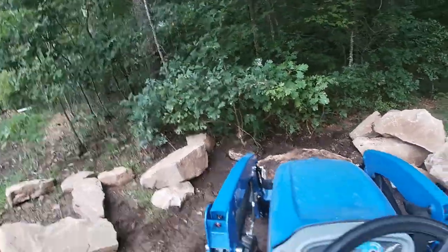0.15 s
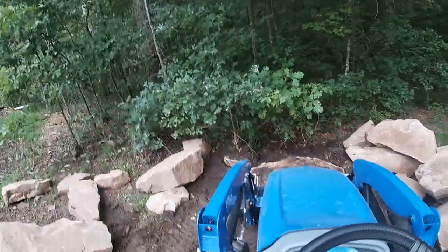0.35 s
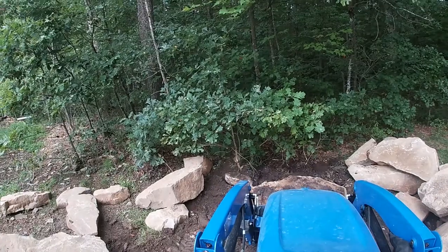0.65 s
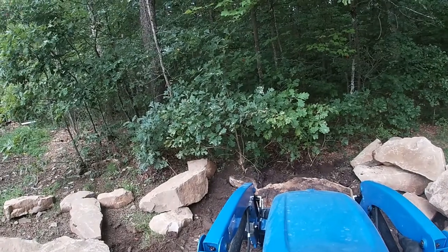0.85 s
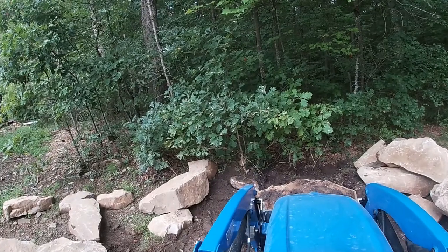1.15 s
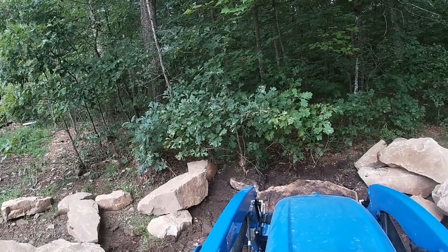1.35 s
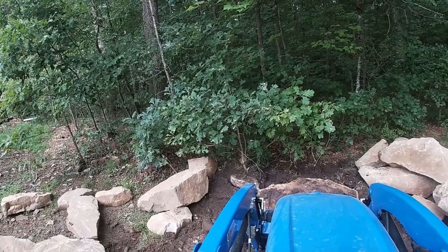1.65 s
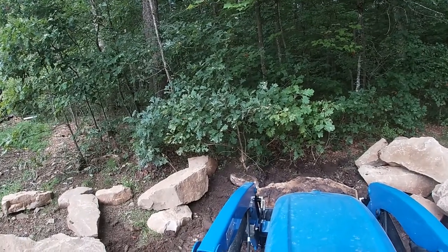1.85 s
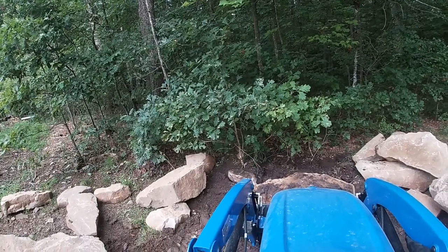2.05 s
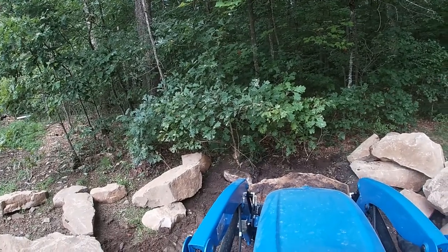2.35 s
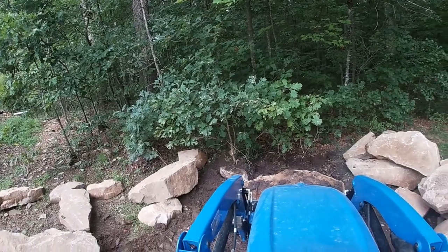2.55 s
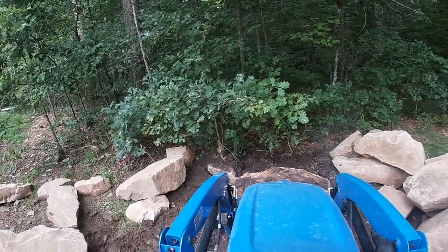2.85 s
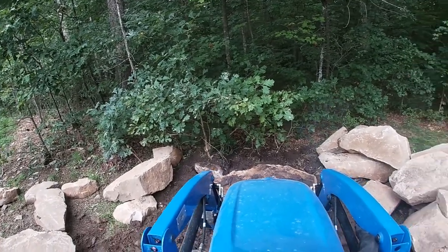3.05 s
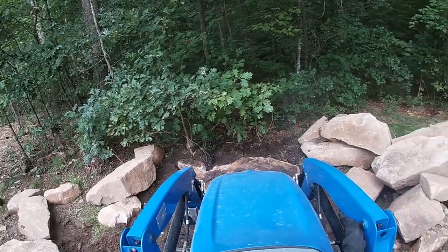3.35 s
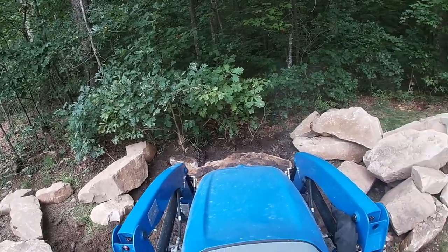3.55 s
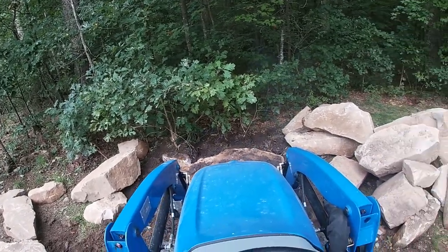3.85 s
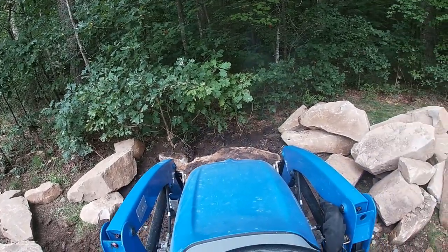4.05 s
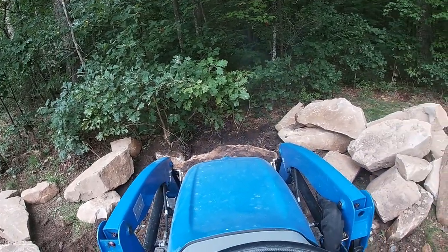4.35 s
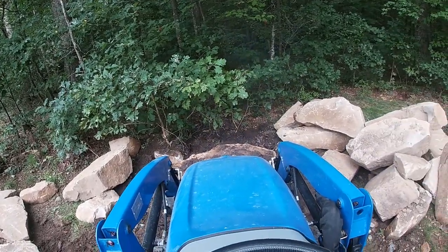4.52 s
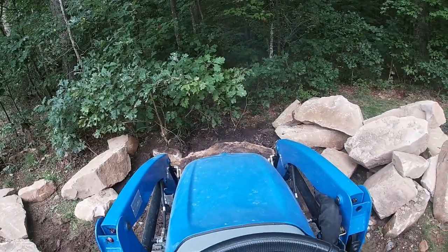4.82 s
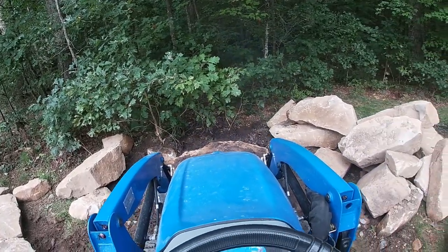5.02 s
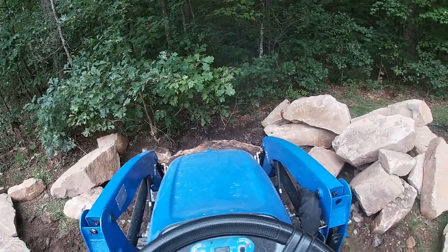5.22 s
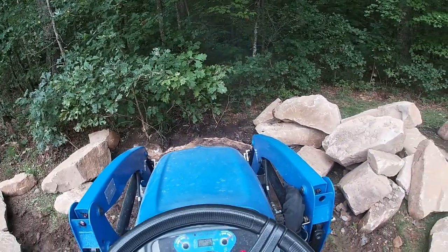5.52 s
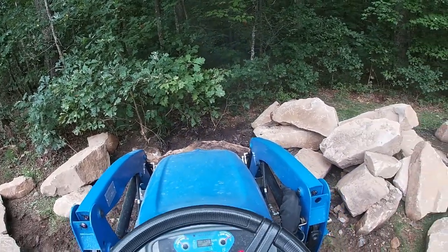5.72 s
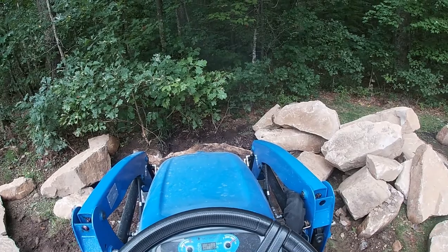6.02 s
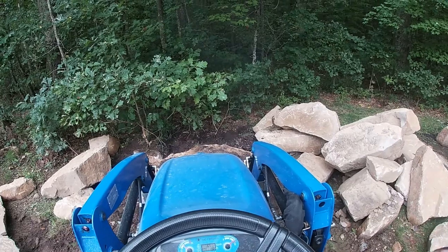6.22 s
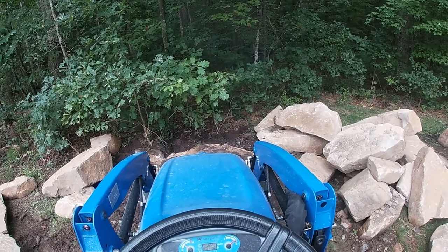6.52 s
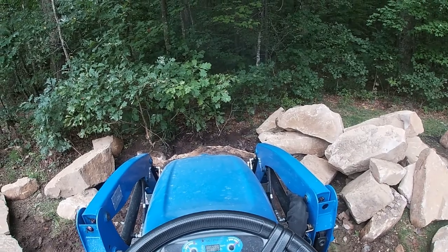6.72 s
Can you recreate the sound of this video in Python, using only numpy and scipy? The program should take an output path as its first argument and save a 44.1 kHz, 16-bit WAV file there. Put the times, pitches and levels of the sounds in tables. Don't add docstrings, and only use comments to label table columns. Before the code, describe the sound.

A small three-cylinder diesel starts, heard very close and dry in the open air. Soft rubbing, a faint seat squeak and a brief priming hum come first, then metallic clacks and a short gritty starter grind. The engine coughs, runs up quickly with booming bonnet and rattling sheet metal, and smooths into a low chugging idle. Later the throttle lifts it to a quicker drone with faint belt and pump whistling.

```python
import sys
import numpy as np
from scipy import signal
from scipy.fft import rfft, irfft, next_fast_len
from scipy.io import wavfile
from scipy.ndimage import uniform_filter1d

SR = 44100
rng = np.random.default_rng(int(sys.argv[2]) if len(sys.argv) > 2 else 0)


def store_wav(level_fs):
    pcm = np.round(np.clip(np.atleast_2d(level_fs), -1, 1) * 32767)
    wavfile.write(sys.argv[1], SR, pcm.T.astype(np.int16))


def undo_db(level):
    steps = np.asarray(level, float) / 20
    return 10 ** steps


N = 303408
TIME = np.arange(N) / SR
IDLE_PER_S = 34.4

# t/s, firing rate/Hz
SPEED = [(1.643, 5.5), (1.72, 7.3), (1.82, 12.7), (1.89, 15.9), (2.01, 21.6), (2.17, 27.5), (2.26, 30.5),
         (2.34, 32.3), (2.45, 34.5), (2.68, 34.6), (2.89, 34.25), (4.3, 34.45), (4.45, 36.9), (4.57, 40.2),
         (4.7, 42.6), (4.81, 42.6), (5.03, 41.8), (6.88, 42.0)]


def rms_one(x):
    return x / np.sqrt(np.mean(x ** 2) + 1e-20)


def low_pass(x, hz):
    return signal.sosfilt(signal.butter(4, hz, fs=SR, output="sos"), x)


def ramp(s, rise_s):
    return np.clip((TIME - s) / rise_s, 0, 1)


def swells(rows):
    total = 0
    for s, rise, fall, level_db in rows:
        side = np.where(TIME < s, rise, fall)
        total = total + undo_db(level_db - 12 * ((TIME - s) / side) ** 2)
    return total


def noise(spectrum, source=None):
    hz, level_db = np.transpose(spectrum)
    size = next_fast_len(N)
    log_hz = np.log(np.maximum(np.arange(size // 2 + 1) * SR / size, 1))
    source = rng.standard_normal(size) if source is None else source
    gain = undo_db(np.interp(log_hz, np.log(hz), level_db, -90, -90))
    return rms_one(irfft(rfft(source, size) * gain, size)[:N])


def drift(rate):
    r = np.exp(-80 * np.pi * rate / SR)
    slow = signal.lfilter([1], [1, -2 * r, r * r], rng.standard_normal(N // 40 + 2002))[2000:]
    return np.interp(np.arange(N) / 40, np.arange(len(slow)), rms_one(slow))


def ring(clicks, hz, level_db, t60):
    r = undo_db(-60 / (max(t60, .005) * SR))
    w = 2 * np.pi * hz / SR
    return undo_db(level_db) * signal.lfilter([0, np.sin(w)], [1, -2 * r * np.cos(w), r * r], clicks + 1e-18)


def resonate(x, peaks):
    out = 0
    for hz, width, level_db in peaks:
        r = np.exp(-np.pi * width / SR)
        poles = [1, -2 * r * np.cos(2 * np.pi * hz / SR), r * r]
        out = out + undo_db(level_db) * signal.lfilter([1 - r, 0, r - 1], poles, x)
    return out


def dying(clicks, t60, rise_s):
    r, a = undo_db(-60 / (t60 * SR)), np.exp(-1 / (rise_s * SR))
    return signal.lfilter([1 - a], [1, -a], signal.lfilter([1], [1, -r], clicks))


def click_at(s, level_db):
    out = np.zeros(N)
    out[round(s * SR)] = undo_db(level_db)
    return out


def knocks(blows):
    tap = [(300, -6), (1000, 1), (2200, 1), (4500, -6), (7000, -32)]
    tick = noise(tap)
    out = 0
    for s, level_db, hz, t60, tick_db in blows:
        hit = click_at(s, level_db)
        body = signal.lfilter([1, -1], [1, -.985], ring(hit, hz, 0, t60))
        out = out + body + undo_db(tick_db) * dying(hit, t60=.031, rise_s=.00099) * tick
    return out


def wavering(tones):
    strands = []
    for split_hz, strand_db in ((0, -.5), (34, -8), (-42, -9)):
        strands.append((split_hz + 6 * drift(35), undo_db(strand_db + 2.6 * drift(50))))
    out = np.zeros(N)
    for hz, level in tones:
        on = np.flatnonzero(level > 1e-6)
        shift = rng.integers(N)
        for waver_hz, flutter in strands:
            phase = 2 * np.pi * np.cumsum(hz[on] + waver_hz[on - shift]) / SR
            out[on] += level[on] * flutter[on - shift] * np.sin(phase)
    return out


def speed_curve():
    s, per_s = np.transpose(SPEED)
    return uniform_filter1d(np.interp(TIME, s, per_s), size=200)


def firing_rate():
    return speed_curve() * (TIME > SPEED[0][0])


def crank_turns():
    return np.cumsum(firing_rate()) / SR - 1e-6


def effort(power):
    full_gain_per_s2, governor_s = 37.8, .28
    gain = uniform_filter1d(np.gradient(speed_curve()) * SR, size=round(governor_s * SR))
    return np.clip(gain / full_gain_per_s2, 0, 1) ** power


def load(rate, idle_db, slope_db, full_db):
    return idle_db + slope_db * (rate - IDLE_PER_S) + full_db * effort(2.2)


def per_firing(turns, lead, cylinder_db, spread_db, delay_s=0):
    count = np.floor(turns - lead).astype(int)
    at = np.flatnonzero(np.diff(count)) + 1
    size_db = np.array(cylinder_db)[count[at] % 3] + spread_db * rng.standard_normal(400)[:len(at)]
    out = np.zeros(2 * N)
    out[at + round(delay_s * SR)] = undo_db(size_db)
    return out[:N]


def seat():
    rub_spectrum = [(71, -45), (120, -5.5), (156, 4), (333, -4.5), (397, -8), (653, -13), (773, -17),
                    (900, -14), (1170, -48), (1980, -120)]
    rustle_spectrum = [(290, -41), (500, -5.5), (911, -15), (1370, -10.5), (1610, -14), (1880, -8.5),
                       (2570, -13.5), (3110, -14.5), (4810, -17), (8290, -23.5), (13000, -60)]
    # t/s, rise/s, fall/s, rub level/dB, rustle level/dB
    moves = [(.022, 0.023, 0.053, -33.5, -39), (.16, 0.16, 0.069, -47, -58.5),
             (.265, 0.028, 0.06, -53, -53.5), (.575, 0.13, 0.098, -65, -58),
             (.655, 0.051, 0.091, -42.5, -55.5), (.934, 0.083, 0.061, -59, -63),
             (1.05, 0.036, 0.13, -57, -84), (1.254, 0.041, 0.025, -58, -52)]
    buzz = ramp(1.684, .065)
    rub = undo_db(-70) + swells([(s, rise, fall, rub_db) for s, rise, fall, rub_db, _ in moves])
    rub = rub + undo_db(-41.5) * buzz
    rustle = undo_db(-65.5) + swells([(s, rise, fall, cloth_db) for s, rise, fall, _, cloth_db in moves])
    rustle = rustle + undo_db(-43) * buzz
    rubbing = rub * undo_db(2.7 * drift(25)) * noise(rub_spectrum)
    return rubbing + rustle * undo_db(-2 + 1.6 * drift(72)) * noise(rustle_spectrum)


def bumps():
    # t/s, peak level/dB, f/Hz, t60/s, tick level/dB
    blows = [(.019, -18, 230, 0.039, -34), (0.149, -41.5, 305, 0.16, -8), (0.258, -43, 1290, 0.047, -14),
             (0.33, -52, 610, 0.07, 2), (0.024, -36, 2700, 0.06, -20), (0.056, -29, 4900, 0.011, -16),
             (.057, -36, 3500, 0.0093, -20), (.63, -44, 4400, .01, -6), (0.012, -43, 8200, .06, -20),
             (.055, -42.5, 8000, .03, -20), (1.204, -44, 1360, 0.054, -3), (1.203, -42, 420, 0.046, -20),
             (1.249, -33.5, 360, 0.059, -30), (1.5, -23, 175, 0.06, -20), (1.845, -30, 1100, 0.051, -17),
             (1.888, -24, 1000, 0.062, -16), (0.643, -20.5, 490, 0.012, -18.5), (0.7, -38, 250, 0.13, -20),
             (0.687, -37, 920, 0.056, -6), (0.71, -41, 475, 0.15, -11), (1.074, -47, 202, 0.048, -8),
             (1.076, -49, 1500, .02, -20), (1.249, -27, 5000, 0.034, -20), (1.287, -28, 1950, .035, -20),
             (1.228, -53, 4500, .02, -20), (1.1, -50, 2550, .03, -20)]
    return knocks(blows)


def wood_and_air():
    wood = [(59, -37.5), (100, -15), (161, 2.5), (312, -22), (376, -24), (512, -16), (993, -17.5),
            (1330, -19.5), (8010, -21), (14000, -52)]
    # t/s, rise/s, fall/s, level/dB
    gusts = [(.044, 0.028, 0.19, -43), (.694, 0.064, .13, -62), (1.02, .12, .35, -73),
             (1.41, 0.03, 0.13, -46), (1.645, .04, 0.015, -46)]
    wind = noise([(15, -13), (32, -4.5), (60, -16), (110, -14.5)])
    return undo_db(-58) * noise(wood) + (swells(gusts) + undo_db(-71.5)) * wind


def seat_spring():
    # t/s, rise/s, fall/s, level/dB
    squeaks = [(.15, .09, .05, -67), (.25, .07, 0.075, -71.5), (.36, .03, .02, -74), (.44, 0.0091, .1, -72)]
    spring = low_pass(resonate(rng.standard_normal(N), [(1265, 110, 0)]), hz=1800)
    return undo_db(11.5) * swells(squeaks) * rms_one(spring)


def creak_and_pump():
    # t/s, half length/s, f/Hz, level/dB
    creak = [(.587, .025, 346, -46), (.588, .025, 640, -52)]
    # t/s, half length/s, f/Hz, level/dB
    hum = [(.98, .12, 2240, -69), (1.0, .1, 2110, -70), (.97, .07, 708, -62)]
    tones = []
    for s, half, hz, level_db in [*creak, *hum]:
        tones.append((hz + 0 * TIME, swells([(s, half, half, level_db)])))
    return wavering(tones)


def clacks():
    # t/s, peak level/dB, t60/s
    blows = [
        (1.203, -40, 0.059),
        (1.229, -52, 0.046),
        (1.248, -12.5, 0.083),
        (1.286, -12.5, 0.21),
        (1.368, -6.5, 6.0),
    ]
    modes = [(485, 2.5, 0.023), (2589, -23, 0.054), (4230, -19, 0.025), (5170, -21, 0.056),
             (7300, -25, 0.076), (8340, -23, 0.1), (8300, -22, 0.18), (9000, 11, 0.036)]
    crack_spectrum = [(120, -41), (200, -17), (400, -7.5), (1280, -8.5), (1560, -5.5), (2130, -7),
                      (5010, -4.5), (6350, -12.5), (7480, -7), (11000, -31), (13900, -39), (15500, -53)]
    crack = noise(crack_spectrum)
    out = 0
    for s, level_db, t60 in blows:
        burst = dying(click_at(s, level_db - 15.5), min(t60, .12), rise_s=.00076) * crack
        out = out + burst
        for hz, mode_db, mode_t60 in modes:
            out = out + ring(burst, hz, mode_db - 41.5 + 3 * rng.standard_normal(), mode_t60)
    return out


def starter():
    gears = [(180, -33), (300, -29), (498, -1.5), (587, -17), (703, -4), (898, -8.5), (1420, -4),
             (1540, -8), (2070, -9), (4850, -11.5), (6400, -18), (7670, -14.5), (15000, -58)]
    gear_case = [(920, 78, -12.5), (1580, 2.8, 3.5), (2840, 44, -13), (3150, 23, -8), (3690, 21, -12),
                 (4350, 35, -15), (4910, 30, -10.5), (7270, 300, -48)]
    # t/s, rise/s, fall/s, level/dB
    grinds = [(1.385, 0.02, 0.071, -27), (1.48, 0.052, 0.069, -29.5), (1.66, 0.1, 0.1, -26),
              (1.78, .04, 0.033, -59.5), (1.895, 0.12, 0.008, -32)]
    # t/s, rise/s, fall/s, level/dB
    groans = [(1.42, 0.05, 0.17, -36.5), (1.34, .03, .03, -61), (1.755, 0.1, 0.025, -45.5),
              (1.895, 0.032, 0.0088, -21.5)]
    # t/s, rise/s, fall/s, level/dB
    rings = [(1.372, 0.005, 0.04, -31), (1.53, 0.055, 0.023, -41), (1.61, .06, .05, -43.5),
             (1.68, 0.041, 0.14, -38), (1.765, 0.036, 0.053, -36), (1.86, 0.031, 0.038, -34.5),
             (1.95, 0.0049, 0.015, -33), (2.21, .01, 0.015, -31.5)]
    flywheel_hz = 1548
    teeth = noise(gears) * undo_db(2.2 * drift(220) + .5 * drift(35))
    grind = rms_one(teeth + undo_db(15.5) * resonate(teeth, gear_case))
    bell_phase = 2 * np.pi * np.cumsum(flywheel_hz + 5 * drift(25)) / SR
    bell = np.sqrt(2) * undo_db(2.2 * drift(50)) * np.sin(bell_phase)
    hum_modes = [(187, 160, -2), (239, 17, 2)]
    groan = rms_one(low_pass(resonate(rng.standard_normal(N), hum_modes), hz=320))
    strike = ring(click_at(1.37, -24), flywheel_hz, 0, t60=.18)
    return strike + undo_db(-4.5) * swells(grinds) * grind + swells(rings) * bell + undo_db(2.5) * swells(groans) * groan


def starter_tones():
    # t/s, half length/s, f/Hz, level/dB
    mesh = [(1.503, .045, 870, -38), (1.686, .035, 1200, -32), (1.5, .04, 760, -37), (1.68, .03, 3150, -43),
            (1.72, .03, 700, -40), (1.81, .03, 470, -42)]
    # t/s, rise/s, f/Hz, sweep/Hz per s, level/dB
    whines = [(1.845, .07, 3560, 6000, -42), (1.83, .11, 7310, 100, -53), (1.81, .06, 6500, 17000, -52),
              (1.8, .05, 3250, 6000, -50)]
    tones = []
    for s, half, hz, level_db in mesh:
        sag_hz = 150 * np.minimum(abs(TIME - s) / half, 3)
        tones.append((hz - sag_hz, swells([(s, half, half, level_db)])))
    for s, rise, hz, slope, level_db in whines:
        tones.append((hz + slope * (TIME - s), swells([(s, rise, .045, level_db)])))
    return wavering(tones)


def exhaust_and_intake(turns, rate):
    cylinders = [(0.3, .8, 5), (-0.3, -.8, -2), (0, 0, -6)]
    pipe = [(40, 0, .024), (108, -15.2, .107)]   # f/Hz, level/dB, t60/s
    # t/s, level/dB, f/Hz, t60/s
    coughs = [(1.661, -22.5, 36.2, 0.34), (1.789, -17, 36, 0.48), (1.871, -24, 40.3, 0.11)]
    exhaust_cyl, intake_cyl, _ = np.transpose(cylinders)
    push = undo_db(23.5 - 11 * (1 - ramp(1.76, .03)))
    push = push / np.sqrt(np.maximum(rate, 5) / 34)
    puffs = per_firing(turns, 0, exhaust_cyl, spread_db=.3, delay_s=.0217)
    puffs = puffs * push * undo_db(load(rate, -26.5, .29, 1))
    gulps = per_firing(turns, .79, intake_cyl, spread_db=1.3)
    gulps = gulps * push * undo_db(load(rate, -28, .34, 2.2))
    low = ring(puffs, *pipe[0]) - ring(puffs, *pipe[1])
    low = low + ring(puffs, 73, -32, t60=.25)
    low = low + ring(gulps, 154, -12.9, t60=.07)
    for s, level_db, hz, t60 in coughs:
        low = low - ring(click_at(s, 0), hz, level_db, t60)
    low = low - (1 - 3.4 * effort(1)) * resonate(low, [(77, 40, -11)])
    low = low_pass(low, hz=260)
    low = low + resonate(low, [(38, 8, -2.5), (205, 70, -6)])
    return low - resonate(low, [(38, 30, -6)])


def knock(turns):
    cylinders = [(0.3, .8, 5), (-0.3, -.8, -2), (0, 0, -6)]
    block = [(305, 14, 0.0042), (480, 4.5, 0.048), (530, 5, 0.058), (707, 4.5, 0.051), (865, 7.5, 0.073)]   # f/Hz, level/dB, t60/s
    bangs = per_firing(turns, .72, np.transpose(cylinders)[2], spread_db=1.5)
    rough = dying(bangs, t60=.013, rise_s=.00049) * (1 + .15 * rng.standard_normal(N))
    return rms_one(sum(ring(rough, *mode) * (-1) ** k for k, mode in enumerate(block)))


def contacts(turns, rate):
    count = 400
    marks, sizes = np.sort(rng.uniform(0, 3, count)), rng.standard_normal(count + 1)
    passed = np.searchsorted(marks, turns % 3)
    blows = np.append(0, np.diff(passed) > 0) * sizes[passed] / np.sqrt(np.maximum(rate, 5))
    return rms_one(blows) * np.sqrt(np.mean(rate > 0))


def mixed(looped, share):
    return np.sqrt(share) * looped + np.sqrt(1 - share) * rng.standard_normal(N)


def block_rumble(turns, looped):
    spectrum = [(90, -33), (150, -3), (230, -5), (330, -14.5), (464, -8), (570, -14.5), (710, -12),
                (800, -20), (1100, -23.5), (1500, -44)]
    thuds = per_firing(turns, .62, [1, -5, 4], spread_db=1.2)
    pulse = rms_one(dying(thuds, t60=.07, rise_s=.003))
    rumble = noise(spectrum, mixed(looped, .35)) * (1 + .3 * pulse)
    modes = [(327, 25, -3.5), (461.4, 27, -.5), (526, 35, -3), (719, 45, -3.5)]
    return rms_one(rumble + undo_db(-3.5) * resonate(rumble, modes))


def valve_clatter(turns, looped):
    spectrum = [(470, -16), (800, -7.5), (952, -12), (1090, -3.5), (1450, -1), (2000, -7), (2910, -6),
                (3290, -4), (3770, -19.5), (4890, -8.5), (8650, -25), (10800, -54), (12400, -43),
                (13800, -46), (15500, -53)]
    panels = [(1070, 350, -13.5), (1603, 110, -12), (2135, 21, -5), (2716, 49, -12), (3640, 130, -8),
              (3870, 130, -6.5), (4550, 30, -15.5), (5530, 70, -10.5), (5910, 60, -6.5), (6430, 60, -3),
              (8300, 81, -24)]
    injections = per_firing(turns, .2, [2, -5, 2], spread_db=1.5)
    rap = dying(injections, t60=.04, rise_s=.001)
    rap = rap * noise([(1300, -20), (1900, 0), (2400, -2), (3200, -20)])
    valves = per_firing(2 * turns, .26, [2.1, -1.1, -2.1], spread_db=2)
    gate = .62 + .43 * rms_one(dying(valves, t60=.19, rise_s=.003))
    fresh = mixed(looped, 0)
    source = fresh + low_pass(mixed(looped, .6) - fresh, hz=5500)
    hiss = noise(spectrum, source) * gate * undo_db(.53 * drift(24))
    clatter = rms_one(hiss + undo_db(14.5) * resonate(hiss, panels))
    return clatter + undo_db(-7.5) * rms_one(rap)


def shift_orders(x, turns, rate):
    # order, idle level/dB, full-effort level/dB, cold level/dB, slope/dB per Hz of firing
    shifts = [(1, -0.5, -8.5, -6, 0.1), (2, 0.3, 1.5, 0.5, 0.0), (3, 0.0, -2, -2, 0.0),
              (4, -1.2, 1.5, -1.5, 0.0), (5, -0.5, -10, 9, 0.1), (6, 0.5, 0.5, -3, -0.9)]
    fuel, cold = effort(1), 1 - ramp(2.3, .4)
    faster = np.maximum(rate - IDLE_PER_S, 0)
    out = x
    for order, idle_db, effort_db, cold_db, slope_db in shifts:
        spin = np.exp(2j * np.pi * order * turns)
        parts = []
        for part in (x * spin.real, x * spin.imag):
            parts.append(uniform_filter1d(uniform_filter1d(part, size=2600), size=2600))
        change = undo_db(idle_db + effort_db * fuel + cold_db * cold + slope_db * faster) - 1
        out = out + 2 * change * ramp(1.93, .1) * (parts[0] * spin.real + parts[1] * spin.imag)
    return out


def engine():
    rate, turns = firing_rate(), crank_turns()
    looped = contacts(turns, rate)
    knock_db = load(rate, -38, .21, 5.6)
    clatter_db = load(rate, -42, -.037, 13.6)
    running = ramp(1.805, .16)
    tonal = exhaust_and_intake(turns, rate) + running * undo_db(knock_db - 4) * knock(turns)
    rumble = undo_db(knock_db + 1.5) * block_rumble(turns, looped)
    clatter = undo_db(clatter_db - 4) * valve_clatter(turns, looped)
    return shift_orders(tonal, turns, rate) + running * (rumble + clatter)


def shaking():
    bonnet = [(147, 51, 0.5), (221, 24, 4), (259, 13, -1.5), (323, 33, -3), (442, 140, -19), (575, 77, -15),
              (805, 130, -17)]
    sheet_spectrum = [(1500, -3), (4500, -7.5), (5900, -3.5), (7900, 1.5), (9500, -3), (11000, -19.5),
                      (14000, -23), (15800, -37)]
    # t/s, peak level/dB
    clanks = [(1.8375, -24), (1.862, -24), (1.8855, -21), (1.956, -20.5), (2.0156, -22.5), (2.068, -24.5),
              (2.16, -26), (1.9251, -39), (2.0009, -29), (2.1381, -42), (1.5729, -44), (1.61, -46),
              (2.2, -24.5), (2.2937, -36), (2.373, -43)]
    # t/s, peak level/dB
    ticks = [(4.4433, -54), (4.4677, -51), (4.495, -47), (4.5206, -47), (4.547, -48), (4.57, -46),
             (4.5969, -50), (4.6204, -55)]
    full_s, rise_s, hold_s = 1.89, .15, .34
    boom = rms_one(low_pass(resonate(rng.standard_normal(N), bonnet), hz=896))
    firings = per_firing(crank_turns(), .72, [0, 0, 0], spread_db=2.5)
    chug = rms_one(dying(firings, t60=.28, rise_s=.004))
    boom = boom * (.79 + .21 * chug)
    after = np.maximum(TIME - full_s - hold_s, 0)
    shake = ramp(full_s - rise_s, rise_s) ** 2 * undo_db(-22.5 - 131 * after)
    sheet = noise(sheet_spectrum)
    hits = sum(click_at(s, level_db - .5) for s, level_db in [*clanks, *ticks])
    clank = dying(hits, t60=.058, rise_s=.0016) * sheet
    rattle = undo_db(-19.5) * shake * undo_db(2.5 * drift(60)) * low_pass(sheet, hz=11600)
    return shake * boom + clank + rattle


def jolts():
    # t/s, peak level/dB, f/Hz, t60/s, tick level/dB
    blows = [(1.858, -23, 323, 0.081, -12), (1.89, -21, 570, 0.047, -17), (1.895, -23, 265, .09, -20),
             (1.91, -30, 790, .08, -14), (1.9466, -24, 900, .04, 3), (1.98, -15.5, 335, 0.09, -14),
             (2.006, -19.5, 680, 0.056, 0), (2.012, -26, 880, .06, -18), (2.067, -24, 213, 0.066, -17),
             (2.106, -13, 215, .06, -16), (2.1606, -32, 680, 0.045, -4), (2.193, -25, 340, 0.077, 3),
             (2.225, -16, 330, 0.081, -13), (2.232, -22, 670, 0.066, -10), (2.445, -31, 470, 0.15, -20)]
    return knocks(blows)


def whistles():
    # t/s, length/s, first f/Hz, last f/Hz, level/dB
    rows = [(2.5, .36, 3270, 3240, -48), (2.83, .21, 3215, 3200, -45.5), (3.0, .42, 3200, 3190, -52),
            (3.3, 1.06, 3245, 3245, -47), (4.31, .17, 3270, 3360, -47), (4.46, .2, 3320, 3330, -52),
            (2.38, .12, 3460, 3460, -52), (4.6, .4, 3470, 3380, -51), (4.82, 2.2, 3290, 3380, -48),
            (4.9, .8, 3300, 3330, -53), (4.55, .12, 4750, 4760, -44), (4.62, .12, 4880, 4920, -43),
            (4.7, .12, 4900, 4900, -43), (4.77, .15, 4920, 4870, -48), (4.81, .27, 4790, 4780, -46.5),
            (5.04, .38, 4760, 4690, -49.5), (5.4, .45, 4820, 4800, -53), (5.7, 1.3, 4760, 4710, -53),
            (4.45, .22, 5060, 5110, -52), (4.8, .45, 5070, 4980, -51), (4.66, .2, 5030, 5030, -53),
            (5.55, 1.4, 5070, 5055, -51), (2.4, .48, 3540, 3520, -50.5), (3.4, 1.1, 4140, 4160, -56),
            (5.7, 1.3, 3900, 3920, -56), (3.5, .8, 3500, 3485, -53), (2.4, .5, 4020, 3980, -57),
            (2.9, .5, 3930, 3950, -56), (3.05, .6, 4640, 4610, -57), (4.55, .45, 4560, 4540, -55),
            (4.55, .45, 4340, 4310, -56), (5.0, 1.95, 4370, 4380, -58), (4.9, 2, 4160, 4180, -58),
            (5.45, 1.4, 4950, 4940, -58), (5.2, 1.7, 3640, 3650, -59)]
    fade_s, settle_s = .06, .3
    tones = []
    for s, length, first, last, level_db in rows:
        hz = last + (first - last) * np.exp(-np.maximum(TIME - s, 0) / settle_s)
        fade = ramp(s, fade_s) * (1 - ramp(s + length - fade_s, fade_s))
        tones.append((hz, undo_db(level_db - 1.5) * fade))
    return wavering(tones)


def scene():
    before = seat() + bumps() + wood_and_air() + seat_spring() + creak_and_pump()
    starting = clacks() + starter() + starter_tones()
    running = engine() + shaking() + jolts() + whistles()
    return (before + starting + running)[None]


def top_cut(x):
    return signal.sosfilt(signal.butter(12, 15730, fs=SR, output="sos"), x)


def record(dry):
    filtered = signal.sosfiltfilt(signal.butter(2, 22, "high", fs=SR, output="sos"), dry)
    return top_cut(.44 * np.tanh(filtered / .46))


dry = scene()
out = record(dry)
store_wav(out)
```